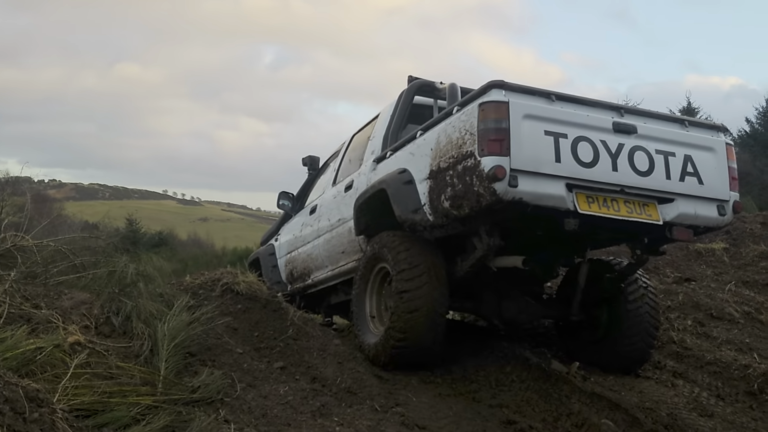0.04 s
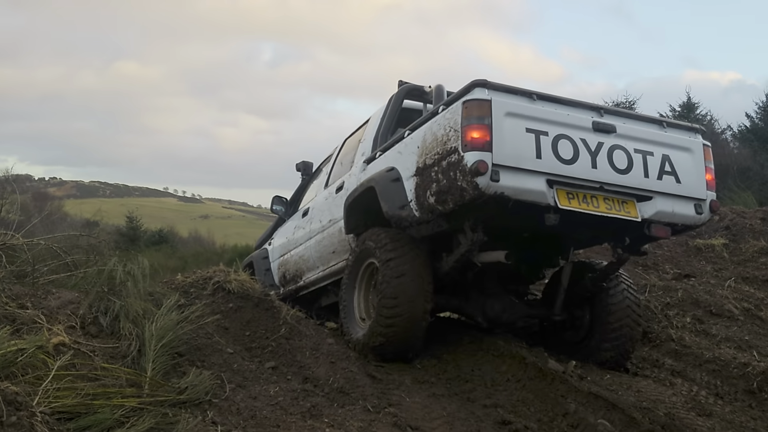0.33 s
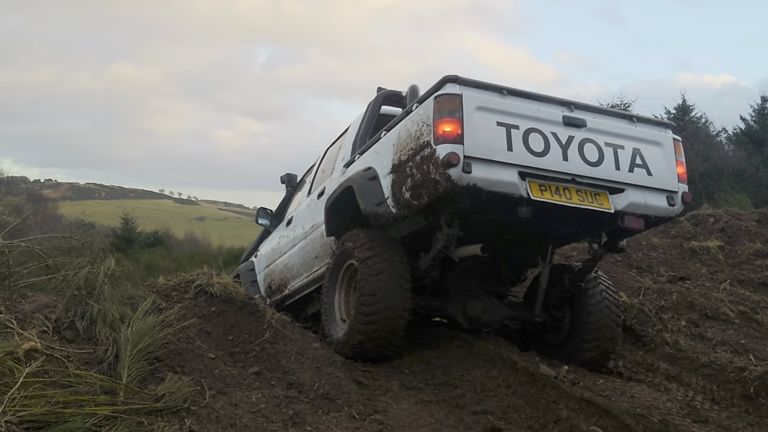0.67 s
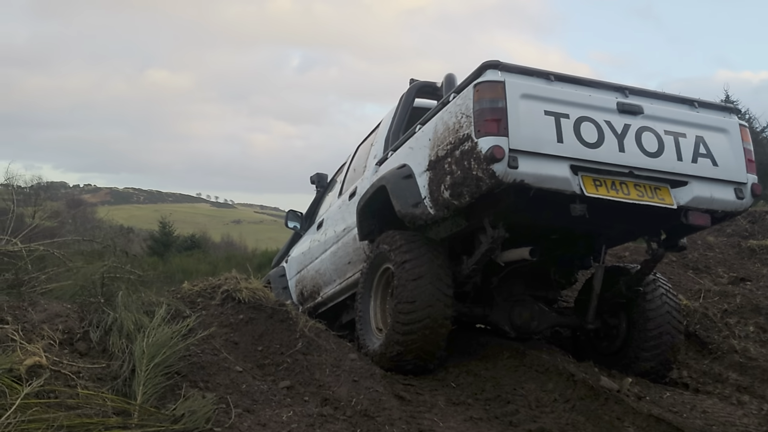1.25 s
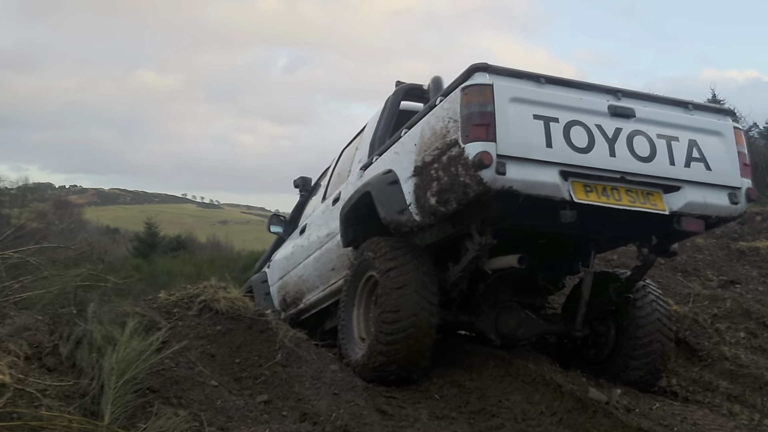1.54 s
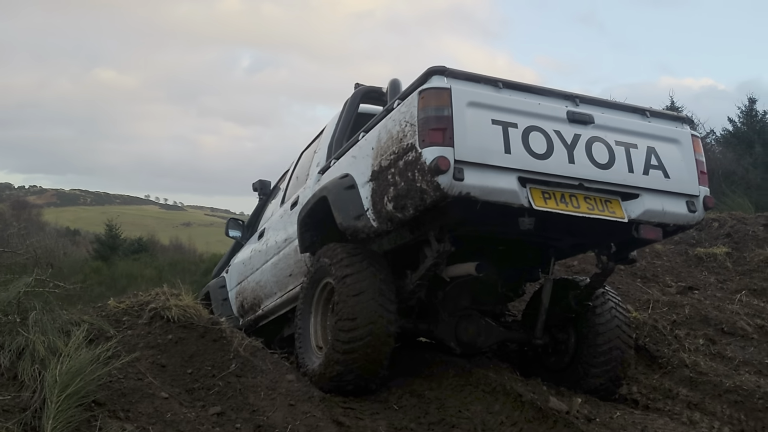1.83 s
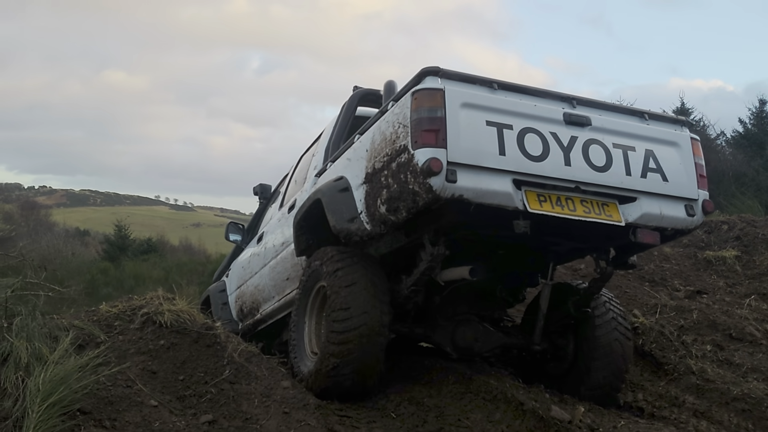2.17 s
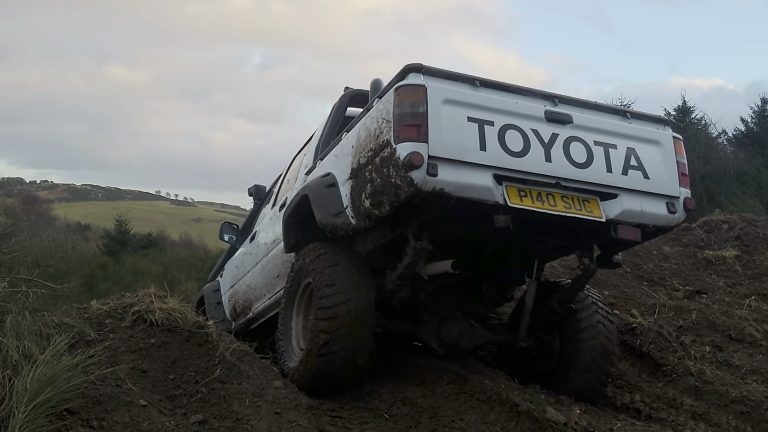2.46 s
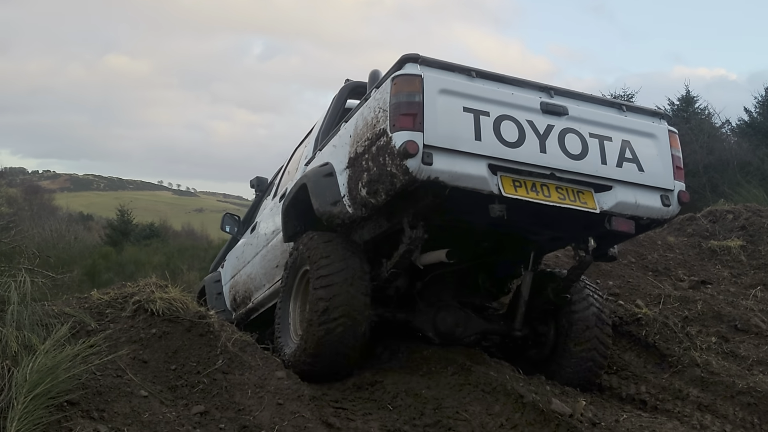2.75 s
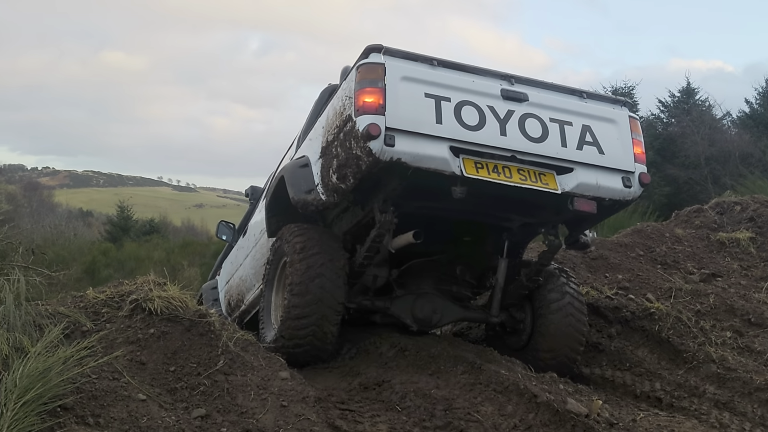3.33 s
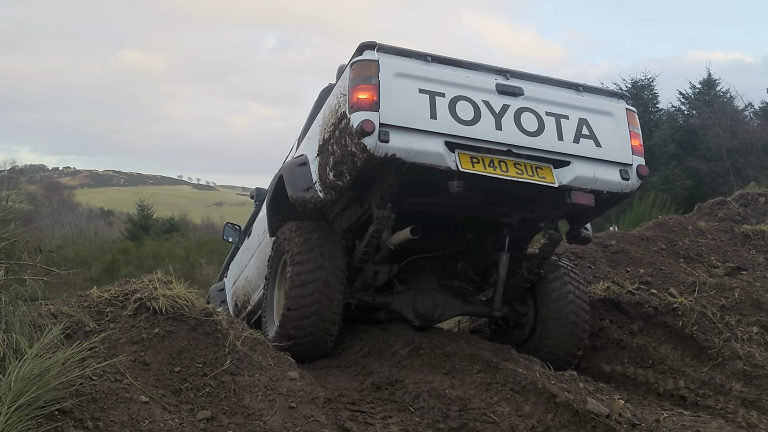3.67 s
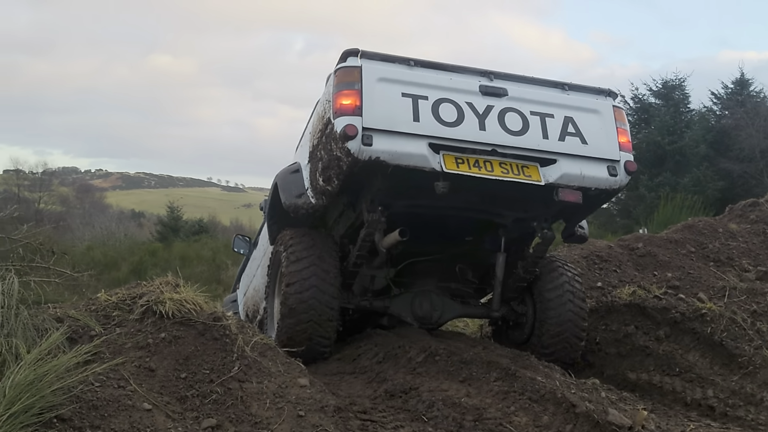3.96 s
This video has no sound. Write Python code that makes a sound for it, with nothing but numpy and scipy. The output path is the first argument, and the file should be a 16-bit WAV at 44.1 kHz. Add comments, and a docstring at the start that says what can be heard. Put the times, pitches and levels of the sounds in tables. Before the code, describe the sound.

A harsh creaking groan from a crawling truck, with wind thumping the microphone and diesel idling.

```python
"""Wind gusts buffet and pop on the microphone, mostly on the left port, over a thudding, ticking idle.
The engine is a diesel pickup's, creeping over a muddy ridge with grit scraping under its tyres.
Its brakes or springs stick and slip: a short creak at 1.3 s, then a loud harsh groan around 2 s.
Each slip snaps, cracks and rasps, and rings the chassis and its thin panels."""
import sys
import numpy as np
from scipy import signal
from scipy.io import wavfile
from scipy.ndimage import uniform_filter1d

SR = 44100
rng = np.random.default_rng(int(sys.argv[2]) if len(sys.argv) > 2 else 0)


def waveform_to_disk(signal):
    """Save audio, clipped to [-1, 1], as 16-bit WAV at the path in sys.argv[1]."""
    frames = np.transpose(np.atleast_2d(signal))
    scaled = np.clip(frames, -1, 1) * 32767
    samples = np.round(scaled).astype(np.int16)
    wavfile.write(sys.argv[1], SR, samples)


N = 176400
TIME = np.arange(N) / SR
RIGHT_LAG_S, LOW_BELOW_HZ = 0.000088, 2100

# stick-slip jolts: t/s, level/dB, low-mode weight/dB, snap level/dB
SLIPS = [(1.268, -16, -10, -27.5), (1.307, -22.5, -8, -40), (1.336, -26, -2.5, -41), (1.367, -21, -8, -33),
         (1.395, -15, -11, -24.5), (1.422, -15, -11.5, -22.5), (1.822, -17, -16, -32),
         (1.848, -20, -7, -25), (1.873, -17.5, -15, -28), (1.894, -14.5, -6, -20), (1.914, -12, -7, -17),
         (1.934, -10, -9.5, -14), (1.954, -11.5, -2.5, -27), (1.9741, -9.5, 0, -6.5), (1.9922, -8, 1, -8),
         (2.0105, -4.5, -1, 1), (2.0283, -9, 2.5, -9.5), (2.046, -6.5, -3.5, -14), (2.063, -6.5, -6.5, -24),
         (2.08, -8, -5.5, -28), (2.098, -13.5, -3, -29), (2.109, -22, 3, -14)]
# creak balance: f/Hz, left minus right/dB
CREAK_PAN = [(100, 13), (1200, 0), (3000, 4), (6000, 4.5), (12000, 7)]


def creak():
    """Brakes or springs stick and slip; each jolt rings panels and chassis, squeals, rasps and cracks."""
    # squeal, sinking as the load grows: t/s, f/Hz
    squeal_pitch = [(1.4, 3260), (1.85, 3104), (2.0, 3120), (2.1, 3080)]
    # chassis modes: f/Hz, level/dB, t60/s
    chassis_modes = [(113.4, 4, 0.4), (182, 10, 0.087), (487, 6, 0.1), (581, 5, 0.067), (638, 8.5, 0.15),
                     (760, -9, 0.13), (1130.5, 3, 0.16), (1324, -6, .08), (1720, -4.5, 0.099),
                     (2446, -14.5, 0.18), (2750, -23, 0.062), (3670, -20, 0.045), (4400, -7.5, 0.063),
                     (4650, -14, 0.093)]
    squeal_db, chassis_db = -27, -27.5
    times_s, slip_db, low_db, _ = np.transpose(SLIPS)
    ringing = panels(times_s, slip_db, count=36)
    ringing += struck_mode(times_s, squeal_db + slip_db, at_time(squeal_pitch, times_s), t60_s=0.085)
    for hz, mode_db, t60_s in chassis_modes:
        strike_db = chassis_db + slip_db + mode_db + low_db * (hz < LOW_BELOW_HZ)
        ringing += struck_mode(times_s, strike_db, hz, t60_s)
    high_jolts = clicks_at(times_s, from_db(slip_db))
    low_jolts = clicks_at(times_s, from_db(slip_db + low_db))
    return ringing + rasp(low_jolts, high_jolts) + crack(low_jolts)


def struck_mode(times_s, levels_db, hz, t60_s):
    """One mode at both ports; strength and pitch scatter from blow to blow."""
    wander, scatter_db = 0.0095, 4.5
    out = np.zeros((2, N + SR))
    age_s = np.arange(SR // 4) / SR
    chance = rng.standard_normal((len(times_s), 3))
    pitches_hz = hz * (1 + wander * chance[:, 0])
    for start_s, db, pitch_hz, scatter in zip(times_s, levels_db, pitches_hz, chance[:, 1:]):
        tone = np.sin(2 * np.pi * pitch_hz * age_s) * from_db(db - 60 * age_s / t60_s)
        for port, lag_s in enumerate((0, RIGHT_LAG_S)):
            i = int((start_s + lag_s) * SR)
            out[port, i:i + len(tone)] += tone * from_db(scatter_db * scatter[port])
    return creak_pan(np.mean(hz)) * out[:, :N]


def panels(times_s, slip_db, count):
    """Thin panels ring in many close high modes, each struck with a random strength."""
    # mode envelope: f/Hz, relative level/dB
    envelope = [(2900, 2), (3200, 3), (3900, -16), (4650, 2.5), (5300, -33), (6800, -15), (7500, -26)]
    pitches_hz = np.geomspace(envelope[0][0], envelope[-1][0], count)
    pitches_hz *= 1 + .01 * rng.standard_normal(count)
    out = 0
    for hz in pitches_hz:
        gains = from_db(slip_db - 39.5 + at_hz(envelope, hz))
        scatter = rng.standard_normal((2, len(times_s)))
        hits = np.array([clicks_at(times_s, gains * side) for side in scatter])
        out += creak_pan(hz) * ring(hits, hz, t60_s=0.06)
    return out


def rasp(low_jolts, high_jolts):
    """The surfaces rub in a brief noise burst at each slip."""
    # rasp spectrum: f/Hz, relative density/dB
    spectrum = [(200, 7.5), (600, 0.5), (1200, 0.5), (2300, -1.5), (3400, 0), (4600, -16), (5800, -19),
                (8000, -25), (12000, -19.5), (15500, -22)]
    rise_s, decay_s = 0.0007, 0.014
    low, high = [decay(jolts, decay_s) - decay(jolts, rise_s) for jolts in (low_jolts, high_jolts)]
    out = 0
    for hz, noise in bands(spectrum):
        out += creak_pan(hz) * noise * (low if hz < LOW_BELOW_HZ else high)
    return from_db(-28) * out


def crack(jolts):
    """Each slip cracks and rebounds: two heavily damped pings."""
    pitch_hz, rebound_s = 1270, 0.0017
    pings = ring(jolts + np.roll(jolts, int(rebound_s * SR)), pitch_hz, t60_s=0.0048)
    lowpass = signal.butter(2, 2 * pitch_hz, fs=SR, output="sos")
    left = from_db(-10) * signal.sosfilt(lowpass, pings)
    return np.array([left, np.roll(left, int(RIGHT_LAG_S * SR))])


def friction():
    """The surfaces let go with a bright snap; at full load they also slide, hissing, then stop dead."""
    # snap and slide spectrum: f/Hz, relative density/dB
    spectrum = [(1500, 7), (3600, 3), (5500, -14), (8500, -14.5), (12000, -9), (15500, -1.5)]
    slide = from_db(-43.5) * burst(start_s=2.005, hold_s=0.096, rise_s=0.024, fall_s=0.0035)
    snaps = sum(from_db(db - 27) * burst(start_s, hold_s=.0035, rise_s=.0004, fall_s=.0016)
                for start_s, _, _, db in SLIPS)
    bright = sum(creak_pan(hz) * noise for hz, noise in bands(spectrum) if hz > spectrum[0][0])
    return (slide + snaps) * bright


def wind():
    """Gusts break into eddies at each port; stronger flow buffets brighter."""
    # gusts per port: t/s, length/s, level/dB
    left_gusts = [(0, 0.043, -10), (0.067, 0.023, -11), (0.106, 0.034, -10), (0.153, 0.035, -8.5),
                  (0.194, .06, -11), (0.267, 0.0049, -8.5), (0.29, 0.026, -9.5), (0.323, 0.14, -13),
                  (0.401, 0.065, -8.5), (0.488, 0.016, -11), (0.545, 0.0074, -13.5), (0.568, 0.044, -12.5),
                  (0.632, 0.023, -9.5), (0.668, .02, -14.5), (0.752, .025, -21.5), (0.824, 0.031, -29),
                  (0.876, 0.19, -30.5), (1.03, 0.066, -27.5), (1.137, 0.11, -26.5), (1.333, 0.098, -26),
                  (1.448, 0.017, -16.5), (1.536, 0.014, -15.5), (1.725, 0.067, -18.5), (1.816, .02, -16.5),
                  (1.868, 0.004, -12.5), (1.894, 0.019, -14), (1.927, 0.19, -19.5), (2.086, 0.04, -14),
                  (2.175, 0.0067, -17), (2.248, 0.089, -15.5), (2.349, 0.033, -16.5), (2.374, 0.011, -14.5),
                  (2.421, 0.037, -17.5), (2.455, 0.077, -13), (2.571, 0.055, -22.5), (2.679, 0.019, -18),
                  (2.741, 0.006, -19.5), (2.846, 0.034, -22), (2.925, 0.034, -17.5), (3.08, .05, -32.5),
                  (3.168, 0.055, -25), (3.376, 0.044, -20.5), (3.455, 0.087, -29), (3.694, 0.054, -29),
                  (3.767, 0.02, -17.5), (3.777, 0.048, -28.5), (3.878, 0.024, -21.5), (3.989, .03, -26)]
    right_gusts = [(0.293, 0.1, -38.5), (1.338, 0.067, -37), (2.121, 0.096, -43.5), (2.264, 0.023, -37),
                   (2.352, 0.033, -33.5), (2.996, 0.048, -34.5), (3.295, 0.0053, -24), (3.325, 0.015, -31),
                   (3.424, .045, -36), (3.484, 0.019, -26.5), (3.54, 0.037, -38), (3.597, 0.062, -32)]
    # full-gust spectrum: f/Hz, relative density/dB
    spectrum = [(25, -19.5), (70, -4.5), (140, -2.5), (230, -2.5), (330, -5.5), (600, -10), (1200, -18.5),
                (2400, -29), (4400, -44), (5600, -73.5), (8000, -83.5), (11000, -79.5), (15000, -72.5)]
    # band response to flow: f/Hz, slope/(dB/dB)
    flow_slopes = [(25, 1), (100, 0.5133), (250, 0.8973), (600, 1.54), (1500, 2.5), (4500, 5), (10000, 1)]
    gain_db, max_eddy_slope = -3.5, 2.08
    full_gust_db = np.array([[-6], [-19]])  # left, right
    flow_db = np.array([gust_db(left_gusts, breeze_db=-37), gust_db(right_gusts, breeze_db=-67.5)])
    swirl_db = np.array([eddy_db(), eddy_db()])
    buffet = 0
    for hz, noise in bands(spectrum):
        slope = at_hz(flow_slopes, hz)
        buffet += noise * from_db(slope * (flow_db - full_gust_db) + min(slope, max_eddy_slope) * swirl_db)
    return buffet * from_db(gain_db + full_gust_db)


def gust_db(gusts, breeze_db):
    """Flow at one port: the strongest gust, or the breeze between gusts."""
    flow = from_db(breeze_db)
    for start_s, length_s, db in gusts:
        flow = np.maximum(flow, from_db(db) * burst(start_s, length_s, rise_s=0.0076, fall_s=0.016))
    return 20 * np.log10(flow)


def eddy_db(depth_db=3, span_s=0.018):
    """Eddies swing the flow quickly, within soft limits."""
    swirl = drift(rate_hz=90)
    swirl = unit_rms(swirl - .5 * uniform_filter1d(swirl, int(span_s * SR)))
    return depth_db * 2 * np.tanh(swirl / 2)


def pops(half_width_cycles=0.4):
    """The hardest eddies kick the left port for about one cycle, from dull bumps to sharp pops."""
    # pressure kicks: t/s, level/dB, f/Hz
    kicks = [(0.171, -8.5, 1300), (.1855, -6.5, 600), (0.2522, -11.5, 1100), (0.2753, -8.5, 1280),
             (0.294, -10.5, 1370), (0.3057, -12, 1480), (0.459, -6.5, 800), (0.4886, -13, 400),
             (.597, 0, 320), (.643, -5, 1000), (.652, -1.5, 450), (0.772, -7.5, 152), (1.462, -12.5, 194),
             (1.539, -18, 790), (1.545, -12, 196), (1.895, -11, 780), (1.902, -6, 100), (2.105, -1.5, 128),
             (2.121, -2, 216), (2.469, 0, 140), (2.509, -3.5, 400), (2.936, -11.5, 190), (3.771, -5.5, 125),
             (3.883, -8.5, 140)]
    left = np.zeros(N)
    for centre_s, db, hz in kicks:
        near = np.abs(TIME - centre_s) < .03
        cycles = (TIME[near] - centre_s) * hz
        left[near] -= from_db(db) * np.sin(2 * np.pi * cycles) / np.cosh(cycles / half_width_cycles) ** 2
    return np.array([left, np.zeros(N)])


def engine():
    """Four diesel cylinders fire in turn: exhaust tones, a steady rush and a knock per firing."""
    # idle speed: t/s, firing rate/Hz
    idle = [(0, 28), (1.0, 18.2), (2.0, 22.3), (3.0, 22.1), (3.65, 22.0), (4.0, 20.6)]
    # exhaust tones: multiple of firing rate, rms level/dB
    harmonics = [(2, -49.5), (3, -58.5), (4, -66), (5, -53.5), (6, -62), (7, -51.5), (8, -56.5)]
    # rush spectrum: f/Hz, relative density/dB
    rush_spectrum = [(30, 7.5), (120, 6), (300, -5), (600, -10.5), (1000, -12), (2200, -16), (3000, -29),
                     (4500, -25.5), (6500, -44)]
    firing_hz = at_time(idle, TIME) * (1 + .015 * drift(rate_hz=3.5))
    cycles = 0.08 + np.cumsum(firing_hz) / SR
    firings_s = np.flatnonzero(np.diff(np.floor(cycles))) / SR
    exhaust = 0
    for order, db in harmonics:
        amplitude = np.sqrt(2) * from_db(db + 2 * drift(rate_hz=5.1))
        exhaust += amplitude * np.sin(2 * np.pi * (order * cycles + rng.random()))
    lowpass = signal.butter(12, 4720, fs=SR, output="sos")
    rush = signal.sosfilt(lowpass, from_db(-49) * shaped_noise(rush_spectrum))
    return exhaust + rush + knock(firings_s)


def knock(firings_s, smoothing_s=0.014):
    """Combustion ticks in narrow noise bands, each cylinder with its own strength."""
    # knock bands: f/Hz, width/Hz, level/dB, decay/s, weight of cylinder pattern
    resonances = [(1846, 150, -57.5, 0.03, 0.18), (2276, 260, -61, 0.0093, 2.1)]
    # cylinder pattern: level/dB
    cylinders_db = [0, 2, -1, 1.5]
    # knock grows clearer as the tail lifts: t/s, gain/dB
    clarity = [(0, -10), (1.0, -10.5), (1.7, -2.5), (2.8, -7.5), (3.3, -5.5), (3.75, 1.5), (4.0, -6)]
    out = 0
    for hz, width_hz, db, decay_s, unevenness in resonances:
        strengths = from_db(unevenness * np.resize(cylinders_db, len(firings_s)))
        gate = uniform_filter1d(decay(clicks_at(firings_s, strengths), decay_s), int(smoothing_s * SR))
        body = signal.butter(2, [hz - width_hz / 2, hz + width_hz / 2], "band", fs=SR, output="sos")
        out += from_db(db) * unit_rms(signal.sosfilt(body, gate * rng.standard_normal((2, N))))
    return out * from_db(at_time(clarity, TIME))


def grit():
    """Stones scrape briefly under the tyres."""
    # scrapes: t/s, length/s, level/dB
    scrapes = [(0.874, 0.0049, -52), (1.502, 0.0022, -51), (1.644, 0.0033, -59.5), (2.685, 0.026, -49),
               (3.933, 0.024, -60)]
    # scrape spectrum: f/Hz, relative density/dB
    spectrum = [(500, 13), (2500, 10), (4500, 2.5), (6000, -33.5), (9000, -28.5), (15000, -11)]
    envelope = sum(from_db(db) * burst(start_s, length_s, rise_s=0.0015, fall_s=0.005)
                   for start_s, length_s, db in scrapes)
    roughness = from_db(2.1 * drift(rate_hz=150))
    return envelope * roughness * shaped_noise(spectrum)


def hiss():
    """Faint steady hiss."""
    # hiss spectrum: f/Hz, relative density/dB
    spectrum = [(3000, 3), (6500, 2.5), (8300, -8.5), (11000, 9.5), (13000, 8), (15000, 6)]
    return from_db(-82.5) * shaped_noise(spectrum)


def from_db(db):
    """Decibels to gain."""
    return 10 ** (np.asarray(db) / 20)


def unit_rms(x):
    """Scale to unit rms."""
    return x / np.sqrt(np.mean(x ** 2) + 1e-20)


def at_time(points, times_s):
    """Read a table on a time axis."""
    return np.interp(times_s, *np.transpose(points))


def at_hz(points, hz):
    """Read a table on a log-frequency axis."""
    points_hz, values = np.transpose(points)
    return np.interp(np.log(hz), np.log(points_hz), values)


def creak_pan(hz):
    """Left and right gains of the creak."""
    db = at_hz(CREAK_PAN, hz)
    return from_db([[db / 2], [-db / 2]])


def drift(rate_hz):
    """Smooth random motion of unit rms."""
    r = np.exp(-2 * np.pi * rate_hz / SR)
    return unit_rms(signal.lfilter([1], [1, -2 * r, r * r], rng.standard_normal(N + SR)))[SR:]


def bands(spectrum):
    """Half-octave stereo noise bands as (f/Hz, signal); total power about 1."""
    edges_hz = 22 * 2 ** np.arange(0, 9.6, .5)
    centres_hz = np.sqrt(edges_hz[1:] * edges_hz[:-1])
    gains = from_db(at_hz(spectrum, centres_hz))
    gains /= np.sqrt(np.sum(gains ** 2 * np.diff(edges_hz)) * 2 / SR)
    white = rng.standard_normal((2, 2, N))
    for k, hz in enumerate(centres_hz):
        bandpass = signal.butter(3, edges_hz[k:k + 2], "band", fs=SR, output="sos")
        yield hz, gains[k] * signal.sosfilt(bandpass, white[k % 2])


def shaped_noise(spectrum):
    """Stereo noise of the given spectral shape."""
    return sum(noise for _, noise in bands(spectrum))


def burst(start_s, hold_s, rise_s, fall_s):
    """Exponential rise up to start_s, hold, exponential fall."""
    attack = np.minimum(TIME - start_s, 0) / rise_s
    release = np.maximum(TIME - start_s - hold_s, 0) / fall_s
    return np.exp(np.maximum(attack - release, -40))


def clicks_at(times_s, gains):
    """Train of one-sample clicks."""
    return np.bincount((times_s * SR).astype(int), gains, N)[:N]


def decay(clicks, decay_s):
    """Each click starts an exponential decay."""
    return signal.lfilter([1], [1, -np.exp(-1 / (decay_s * SR))], clicks + 1e-18)


def ring(clicks, hz, t60_s):
    """Each click starts a damped sine of its own height."""
    r, w = from_db(-60 / (t60_s * SR)), 2 * np.pi * hz / SR
    return signal.lfilter([0, np.sin(w)], [1, -2 * r * np.cos(w), r * r], clicks + 1e-18)


def scene():
    """Truck, wind and hiss, in stereo."""
    return engine() + creak() + friction() + grit() + wind() + pops() + hiss()


def record(dry):
    """Round the peaks and cut the top."""
    ceiling, stop_hz = .9, 17000
    rounded = dry / (1 + (dry / ceiling) ** 6) ** (1 / 6)
    return signal.sosfilt(signal.cheby2(14, 70, stop_hz, fs=SR, output="sos"), rounded)


dry = scene()
out = record(dry)
waveform_to_disk(out)
```